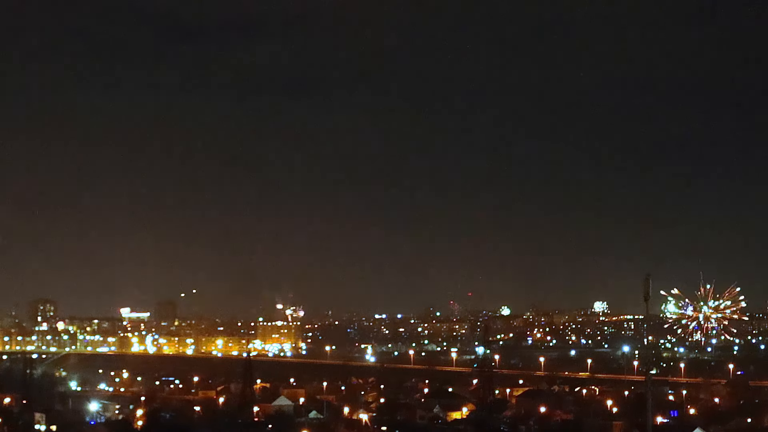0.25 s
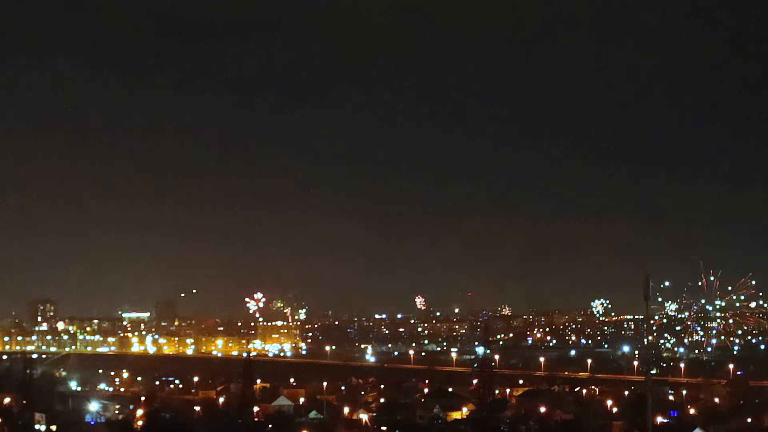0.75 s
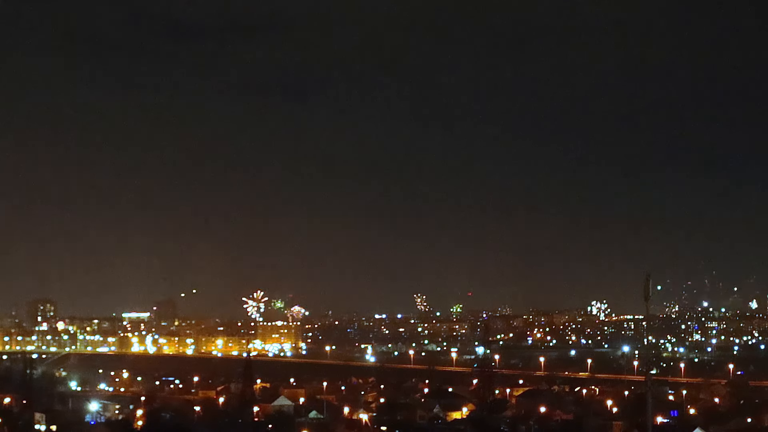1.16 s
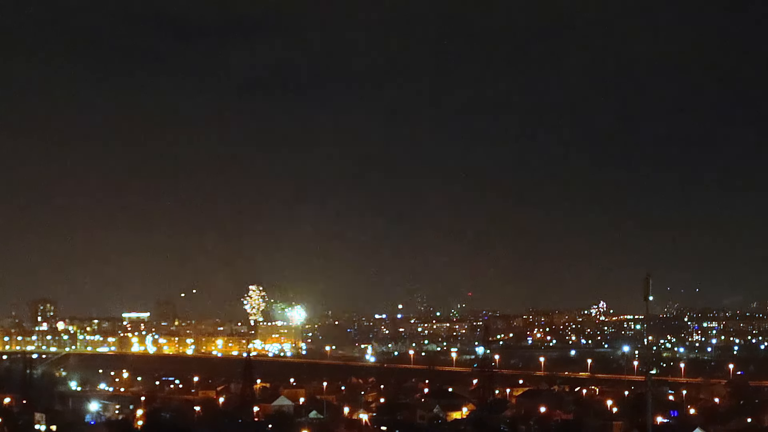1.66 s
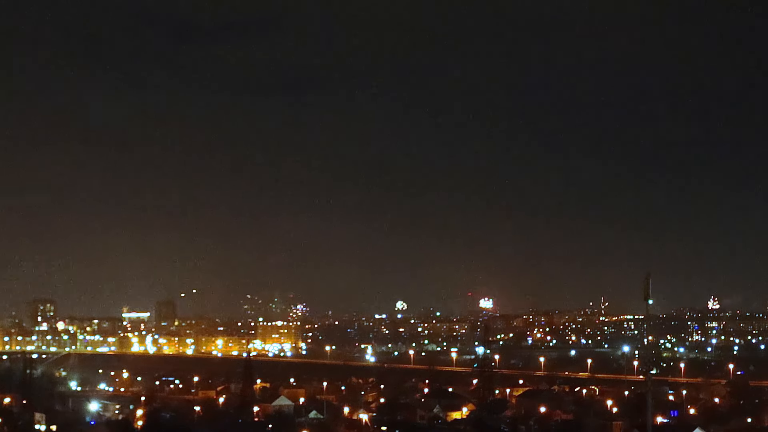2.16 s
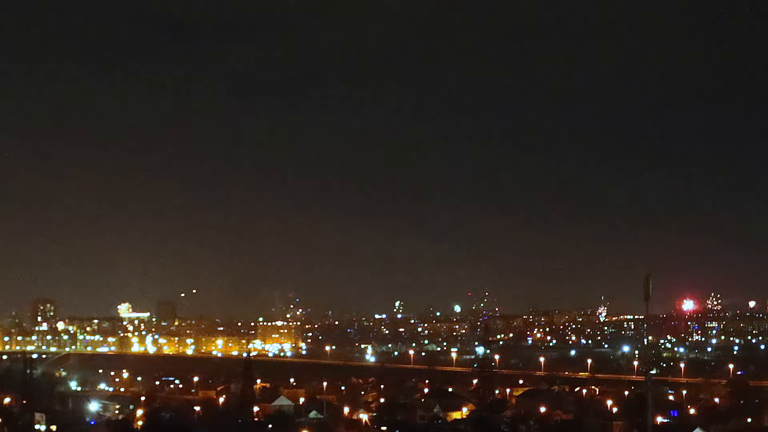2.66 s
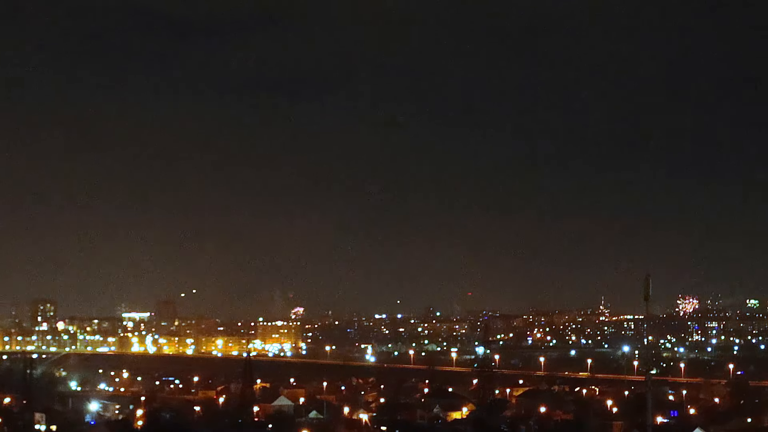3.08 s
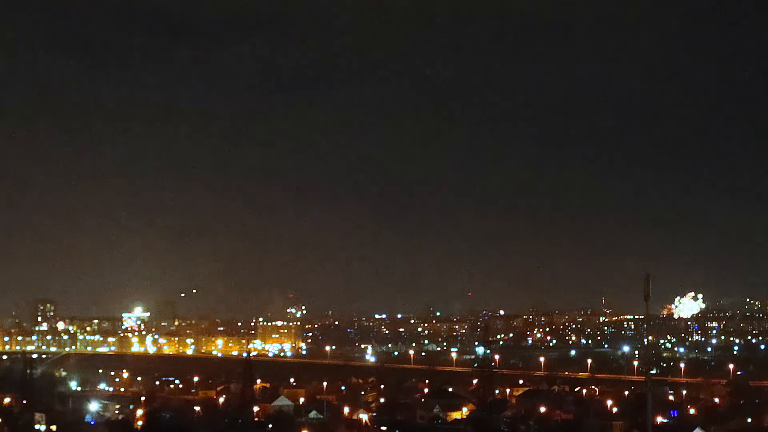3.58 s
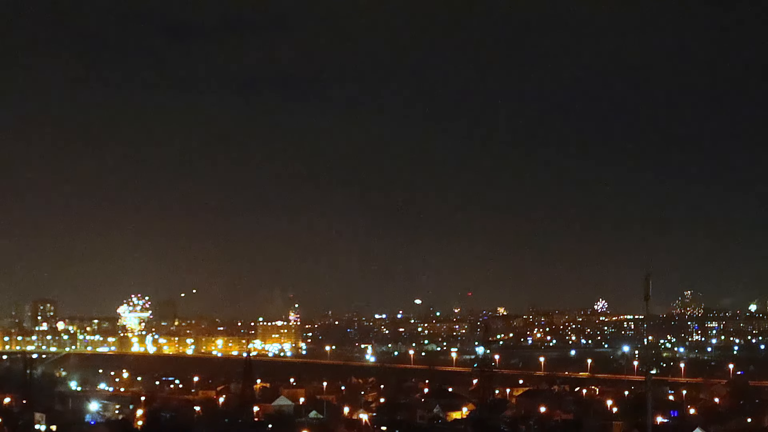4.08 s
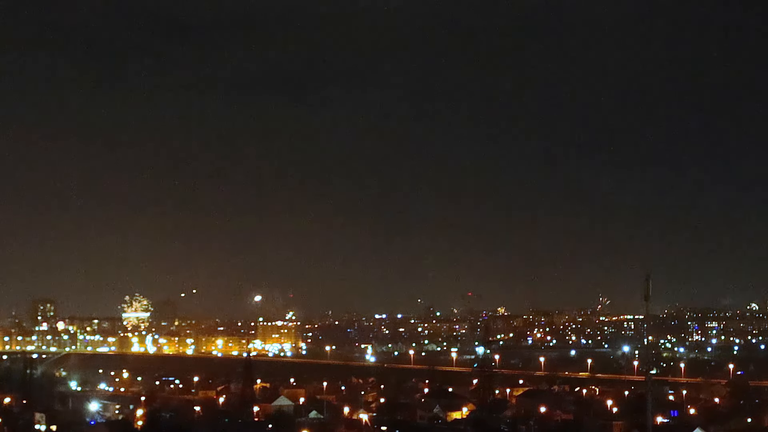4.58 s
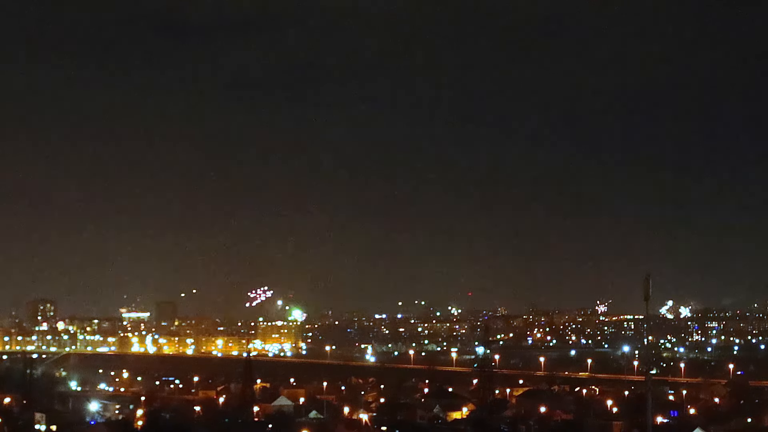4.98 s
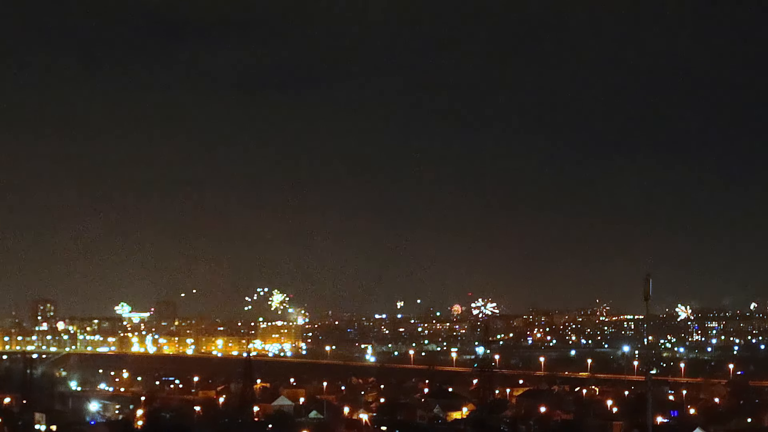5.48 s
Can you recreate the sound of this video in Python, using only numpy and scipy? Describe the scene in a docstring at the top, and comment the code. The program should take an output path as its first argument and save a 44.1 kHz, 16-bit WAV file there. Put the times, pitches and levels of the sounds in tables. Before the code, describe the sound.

Distant fireworks boom across a city at night, dull overlapping thuds and echoes over a low rumble, with a few sharper cracks.

```python
"""Fireworks boom all over a city at night, heard from a high place far away.
Each shell sends a dull thud of air pressure, then a crowd of echoes off the buildings.
The two loudest bangs also snap, a few nearer firecrackers pop, and farther bursts blur into a rumble.
At the start a gust with one sharp tick buffets the right microphone, then the bass thins and
creeps back. Faint rustles and snaps sound close by."""
import sys
import numpy as np
from scipy import signal
from scipy.fft import rfft, irfft, next_fast_len
from scipy.io import wavfile
from scipy.ndimage import uniform_filter1d, minimum_filter1d

SR = 44100
rng = np.random.default_rng(int(sys.argv[2]) if len(sys.argv) > 2 else 0)


def dump(signal):
    """Clip the signal to [-1, 1] and save it as 16-bit WAV at the path in sys.argv[1]."""
    limited = np.clip(np.atleast_2d(signal).T, -1, 1)
    pcm = np.round(limited * 32767).astype(np.int16)
    wavfile.write(sys.argv[1], SR, pcm)


N = 252693
TIME = np.arange(N) / SR

# The clearest shells. Each row: start in seconds, relative thud peak in dB, relative echo level in dB,
# early echo t60 (seconds to fade by 60 dB), treble lift in dB, boom pitch in Hz.
SHELLS = [(0.362, -25, -31.0, 0.39, -0.5, 410), (0.386, -18, -25.5, 0.16, 2, 339),
          (0.49, -21, -29, 0.74, -3.5, 305), (0.546, -13, -22, 0.32, 1, 357),
          (0.662, -15.5, -23, 0.59, -1.5, 428), (0.696, -25.5, -26.5, 0.28, -0.5, 345),
          (0.79, -24.5, -38, 0.2, -13.5, 346), (1.045, -26.5, -28, 0.25, -4.5, 318),
          (1.08, -18, -30, 0.45, 0.5, 285), (1.243, -12, -29.5, 0.81, -6, 290),
          (1.287, -19.5, -27, 0.48, -3.5, 338), (1.494, -9, -25.0, 1.4, -8.5, 327),
          (1.537, -22, -25.5, 0.26, -8, 357), (1.571, -15.5, -22, 0.23, -6.5, 310),
          (1.631, -16.5, -25.5, 0.27, -0.5, 430), (2.016, -20.5, -24, 0.53, -3.5, 315),
          (2.06, -27, -33.5, 0.32, -3, 342), (2.2, -22, -27.5, 2.5, -14.5, 322),
          (2.265, -13, -21.5, 0.18, -2.5, 369), (2.458, -26, -26.5, 1.23, -1, 312),
          (2.4863, -3, -27.5, 0.15, 5.5, 319), (2.518, -20.5, -33, 0.16, -4.5, 334),
          (2.55, -19, -25, 0.24, -0.5, 340), (2.612, -21.0, -29.0, 0.22, -9.5, 344),
          (2.672, -29.5, -26.5, 0.49, -6, 405), (2.782, -12, -24, 0.62, -2, 390),
          (2.953, -18.5, -24.5, 0.69, -8.5, 328), (3.096, -17.5, -32.5, 1, 1, 413),
          (3.15, -10, -21.5, 0.35, 5.5, 252), (3.179, -23, -20.5, 0.21, -6.5, 340),
          (3.228, -25.5, -31.5, 0.28, -7, 329), (3.284, -20.5, -22, 0.33, -5, 382),
          (3.361, -19.5, -24.5, 0.3, -3.5, 310), (3.386, -23.5, -24.5, 0.22, -3, 317),
          (3.407, -16.5, -28, 0.81, -9.0, 305), (3.551, -16, -24.0, 0.41, -7.5, 286),
          (3.59, -23, -31.5, 0.43, 0, 313), (3.676, -19, -31.5, 0.8, 0.5, 292),
          (3.837, -19.5, -26, 1.7, -2, 262), (3.89, -15.5, -23.5, 0.28, -11.5, 318),
          (3.925, -15, -23.5, 0.56, -3, 320), (3.98, -18.5, -24.5, 0.27, -4, 335),
          (4.043, -20, -18.5, 0.4, -5, 295), (4.073, -22.5, -24, 0.32, -9, 347),
          (4.165, -18, -35, 0.17, -12.5, 335), (4.299, -26.5, -33, 0.29, -10.5, 314),
          (4.401, -14.5, -19, 0.24, -11, 470), (4.792, -10, -22.0, 0.61, -5, 330),
          (4.824, -16.5, -28.5, 0.54, -6, 344), (4.865, 1, -20, 0.099, 8.5, 373),
          (4.895, -19, -24, 0.35, -5, 326), (5.043, -16, -23.5, 0.24, -8, 460),
          (5.079, -16.5, -30, 2.8, -8, 460), (5.101, -14, -34.5, 0.18, 7.5, 380),
          (5.135, -18.5, -30, 0.6, 7.5, 383), (5.186, -14, -20.5, 0.2, -2, 374),
          (5.221, -15.5, -20, 0.2, -9, 436), (5.32, -19.5, -20, 0.11, -10.5, 400),
          (5.392, -29.5, -34, 0.33, -14, 342), (5.445, -24.5, -35, 0.24, -17.5, 350),
          (5.528, -19.5, -18.5, 0.24, -5, 381), (5.559, -19, -21, 0.19, -4, 371),
          (5.672, -21.5, -28, 0.31, 0, 390), (5.718, -18, -18.5, 0.27, -5.5, 354)]
# Sharp cracks: nearer firecrackers, the snap of the two loudest bangs, and one tick in the gust.
# Each row: start in seconds, relative level in dB, early t60 in seconds.
CRACKS = [(.113, -42.5, 0.046), (0.547, -40.5, 0.3), (2.237, -27, 0.25), (2.252, -32, 0.14),
          (2.487, -41.5, 0.04), (3.094, -45.5, 0.14), (4.865, -40.5, 0.11)]
# How the far rumble rises and falls. Each row: time in seconds, level in dB.
RUMBLE_LEVELS = [(.2, -36), (.33, -39), (.8, -36), (1.4, -37.5), (1.95, -40.5), (2.15, -37.5), (3, -37),
                 (3.5, -37), (3.8, -41), (4.3, -37.5), (4.7, -37), (5.7, -36)]
# Puffs of wind. Each row: start in seconds, level in dB, hold time in seconds.
WIND_PUFFS = [(0, -24.5, 0.03), (0.038, -14, 0.033), (0.097, -10.5, 0.0068), (0.133, -25, 0.02)]
# Rustles and snaps. Each row: start in seconds, level in dB, pitch in Hz, width in octaves,
# rise time in seconds, t60 in seconds.
RUSTLES = [(.85, -71, 3630, 0.35, 0.011, 0.23), (1.87, -64.5, 2690, 0.24, .009, .2),
           (1.974, -67.5, 3440, .25, .004, 0.21), (2.059, -68, 3420, 0.43, 0.0042, 0.18),
           (3.879, -77, 5700, 0.14, 0.026, 0.55), (4.229, -70.5, 5730, .19, .029, .4),
           (4.344, -58.5, 2680, 0.28, 0.005, 0.19), (4.356, -61.5, 5570, .36, .001, 0.31),
           (4.36, -47, 3340, .18, 0.0015, 0.15), (4.373, -48, 2440, 0.39, 0.0049, 0.28),
           (4.68, -74, 5460, .13, 0.029, 0.29), (5.13, -62.5, 8450, 0.89, .001, 0.32),
           (5.175, -67.5, 8500, 0.75, .008, 0.42), (5.301, -61, 5000, 0.71, .002, 0.31)]
# The tone of each sound, from bass to treble. Each row: frequency in Hz, relative level in dB.
THUD_TONE = [(30, -39), (90, -15.5), (180, -5), (260, 0.5), (350, 7), (480, 0), (650, -20), (1200, -21),
             (2000, -40), (3200, -49), (6000, -59.5), (13000, -84)]
SLAP_TONE = [(100, -30), (300, -1), (550, 8.5), (900, 3.5), (1300, -7), (2000, -19), (3200, -50.5),
             (6000, -69.5)]
ECHO_TONE = [(30, -32), (50, -38), (70, -17), (105, -18), (145, -4.5), (240, -2.5), (350, -3), (500, 2),
             (780, -14.5), (1100, -11.5), (1600, -21.5), (2300, -31), (3200, -61.5), (4500, -64),
             (8000, -95)]
CRACK_TONE = [(200, -28), (700, -13.5), (1200, 9), (1700, 3.5), (2400, -3.5), (3200, -15.5), (4200, -27.5),
              (6000, -49), (9000, -63.5)]
RUMBLE_TONE = [(30, -56.5), (50, -43), (75, -20.5), (140, -8), (230, -7), (350, -5.5), (500, -3),
               (780, -11.5), (1130, -14.5), (1700, -27.5), (2500, -41), (3500, -50.5), (6000, -74.5)]
WIND_TONE = [(25, -25), (70, -3), (150, 6), (280, 4.5), (450, -4), (900, -12), (1600, -32.5), (3000, -68),
             (6000, -90)]
HISS_TONE = [(500, -0.5), (3500, 1), (6000, -1.5), (9000, -8), (12300, -8), (13500, -26)]
# Notes that ring between nearby walls. Each row: pitch in Hz, width in Hz, strength in dB.
WALL_NOTES = [(143.6, 18, -4), (197.7, 19, -1.5), (248.8, 16, 3.5), (326, 55.4, -2), (988, 22, -10)]
# How alike left and right sound. Each row: frequency in Hz, likeness from 0 to 1.
STEREO_LIKENESS = [(60, 0.89), (180, 0.98), (310, 0.97), (540, 0.8), (940, 0.61), (1620, 0.071),
                   (2800, 0.019)]


def shells(thud_db=-5, echo_db=-3, slap_db=-16.5, slap_t60=.053, boom_db=-26.5, boom_t60=.32):
    """Each shell sends a pressure thud, a slap off the nearest roofs, a round boom and city echoes."""
    thuds, echoes = np.zeros((1, N)), np.zeros((2, N))
    t = TIME[:SR]
    for start, peak_db, level_db, t60, treble_db, boom_hz in SHELLS:
        pitch = boom_hz / 350  # bigger charges boom lower
        mid_db = 4.5 + .33 * treble_db
        thud = response(shifted(THUD_TONE, pitch), air(mid_db + 1, treble_db))
        add(thuds, start, undb(peak_db + thud_db) * thud[None] / np.abs(thud).max())
        # The loudest shells burst high above the roofs and slap no harder; small, high-pitched ones do.
        slap_gain = undb(min(peak_db, -6.5) + slap_db + mid_db + 7.5 * np.log2(pitch))
        slap = clicks(len(t), per_s=2300) * fade(t, slap_t60)
        add(echoes, start, slap_gain * through(slap, response(SLAP_TONE)))
        boom = clicks(len(t), per_s=1100) * fade(t, boom_t60)
        boom = through(boom, response(band(boom_hz, octaves=.24)))
        add(echoes, start, undb(peak_db + boom_db) * boom)
        train = hollow(clicks(len(t), per_s=1100))
        train *= roll(t, t60, tail_db=-22, tail_t60=2.3, rise_s=.0002)
        echo_filter = response(shifted(ECHO_TONE, np.sqrt(pitch)), air(mid_db, treble_db))
        add(echoes, start, undb(level_db + echo_db) * through(train, echo_filter))
    return ground_bounce(thuds) + spread(echoes)


def air(mid_db, treble_db):
    """A lift or cut for the middle and treble: air takes more of both from far bursts."""
    return [(450, .011), (950, mid_db), (2400, treble_db)]


def ground_bounce(thud, lag_s=.00524, bounce_db=-13):
    """The thud arrives twice: straight, then bounced off the ground."""
    return thud + undb(bounce_db) * np.interp(TIME - lag_s, TIME, thud[0], left=0)


def hollow(train, depth=.5, count=4):
    """Walls by the launch site repeat the sound within 20 milliseconds, making it hollow."""
    taps = np.zeros(SR // 50)
    taps[rng.integers(len(taps) // 10, len(taps), count)] = depth * rng.choice([-1, 1], count)
    taps[0] = 1
    return through(train, taps / np.sqrt(np.sum(taps ** 2)))


def roll(t, t60, tail_db, tail_t60, rise_s):
    """Echo loudness over time: a quick fade off near blocks, a long roll from the rest of the city."""
    tail = undb(tail_db) * fade(t, tail_t60)
    return np.hypot(fade(t, t60), tail) * (1 - np.exp(-t / rise_s))


def cracks():
    """Sharp cracks: nearer firecrackers, the snap of the two loudest bangs, and one tick in the gust."""
    out, t = np.zeros((2, N)), TIME[:2 * SR]
    for start, db, t60 in CRACKS:
        shape = roll(t, t60, tail_db=-13, tail_t60=1.82, rise_s=.00013)
        add(out, start, undb(db) * clicks(len(t), per_s=1500) * shape)
    return panned(spread(through(out, response(CRACK_TONE))), right_db=4)


def far_rumble(count=110, scatter_db=3, t60=1.0, steady_share=.5):
    """The echoes of many farther bursts overlap into one swelling rumble."""
    power, t = np.zeros((1, N)), TIME[:SR // 2]
    for when, size in zip(rng.random(count), rng.standard_normal(count)):
        burst = undb(scatter_db * np.clip(size, -2, 2)) * fade(t, t60)
        add(power, when * N / SR, burst[None] ** 2)
    swell = np.sqrt(steady_share + (1 - steady_share) * power / power.mean())
    rumble = spread(through(clicks(N, per_s=1500) * swell, response(RUMBLE_TONE)))
    return rumble * undb(np.interp(TIME, *np.transpose(RUMBLE_LEVELS)))


def walls(x):
    """Walls near the listener let a few notes ring on."""
    return x + sum(undb(db) * signal.lfilter(*signal.iirpeak(hz, hz / width, fs=SR), x)
                   for hz, width, db in WALL_NOTES)


def gust(left_db=-22, rise_s=.0077, t60=.079):
    """Swirls of wind thump on the right microphone and barely reach the left one."""
    strength = sum(undb(db) * pulse(TIME - start, rise_s, hold, t60) for start, db, hold in WIND_PUFFS)
    swirls = clicks(N, per_s=1400) * strength
    return through(swirls, response(WIND_TONE)) * undb([[left_db], [0]])


def rustles(clump_db=2, clump_samples=130):
    """Short, faint brushes near the microphone, made of tiny clicks in loose clumps."""
    out, t = np.zeros((2, N)), TIME[:SR // 2]
    for start, db, hz, octaves, rise_s, t60 in RUSTLES:
        wobble = unit(uniform_filter1d(rng.standard_normal(len(t)), clump_samples))
        clumps = unit(undb(clump_db * wobble))
        grains = clicks(len(t), per_s=2600) * pulse(t, rise_s, 0, t60) * clumps
        add(out, start, undb(db) * through(grains, response(band(hz, octaves))))
    return panned(spread(out), right_db=3)


def hiss(level_db=-72):
    """The microphones add a faint, steady hiss."""
    return undb(level_db) * through(rng.standard_normal((2, N)), response(HISS_TONE))


def clicks(size, per_s):
    """Two rows of random clicks; each click stands for one echo, grain or swirl."""
    hits = rng.random((2, size)) < per_s / SR
    return unit(hits * rng.choice([-1, 1], (2, size)) * (.5 + rng.random((2, size))))


def fade(t, t60):
    """Die away by 60 dB every t60 seconds."""
    return undb(-60 * t / t60)


def pulse(t, rise_s, hold_s, t60):
    """Rise, hold, then die away."""
    return np.clip(t / rise_s, 0, 1) * fade(np.maximum(t - rise_s - hold_s, 0), t60)


def undb(db):
    """Turn decibels into a multiplier."""
    return 10 ** (np.asarray(db) / 20)


def unit(x):
    """Scale to an average power of 1."""
    return x / np.sqrt(np.mean(x ** 2))


def band(hz, octaves):
    """A tone with one rounded hump, 4 dB down at this many octaves to either side."""
    return [(hz * 2 ** (k * octaves), -4 * k * k) for k in np.arange(-5, 6)]


def shifted(tone, ratio):
    """Move a tone up or down in pitch."""
    return [(hz * ratio, db) for hz, db in tone]


def on_bins(points, size):
    """Read a curve of (Hz, value) points at each frequency of an FFT."""
    hz, value = np.transpose(points)
    return np.interp(np.log(np.arange(size // 2 + 1) * SR / size + 1), np.log(hz), value)


def response(tone, lift=((1, 0), (2, 0)), size=4096):
    """Build a filter with energy 1 from a tone and an extra lift in dB."""
    cepstrum = irfft(np.log(undb(on_bins(tone, size) + on_bins(lift, size))))
    # Folding onto the first half makes the filter start sharply and ring afterwards.
    cepstrum[1:size // 2] *= 2
    cepstrum[size // 2 + 1:] = 0
    taps = irfft(np.exp(rfft(cepstrum)))[:size // 2]
    return taps / np.sqrt(np.sum(taps ** 2))


def through(x, taps):
    """Pass every channel through a filter."""
    return signal.fftconvolve(x, taps[None], axes=1)[:, :x.shape[1]]


def add(out, start_s, sound):
    """Mix a sound in at its start time."""
    i = min(max(int(start_s * SR), 0), N - 1)
    out[:, i:i + sound.shape[1]] += sound[:, :N - i]


def spread(pair):
    """Turn two unrelated signals into left and right: alike in the bass, apart in the treble."""
    size = next_fast_len(N, True)
    alike = np.clip(on_bins(STEREO_LIKENESS, size), 0, .995)
    side = irfft(rfft(pair[1], size) * np.sqrt((1 - alike) / (1 + alike)), size)[:N]
    return np.array([pair[0] + side, pair[0] - side])


def panned(x, right_db):
    """Move a stereo sound to the right."""
    return x * undb([[-right_db / 2], [right_db / 2]])


def scene(right_lag_samples=4):
    """Mix everything; the left microphone hears the city a little earlier and softer."""
    left, right = walls(shells() + cracks() + far_rumble()) + rustles()
    right = np.interp(TIME - right_lag_samples / SR, TIME, right)
    city = panned(np.array([left, right]), right_db=2.5)
    return city + gust() + hiss()


def thin_bass(x, bass_hz=190, lift_db=1.5, start_s=.17, fall_s=.02, dip_db=-18.5, recover_db_per_s=11.5):
    """The bass, otherwise slightly lifted, drops after the gust and creeps back."""
    bass = signal.sosfiltfilt(signal.butter(2, bass_hz, fs=SR, output="sos"), x)
    since = TIME - start_s
    change_db = np.clip(since / fall_s, 0, 1) * np.minimum(dip_db + recover_db_per_s * since, 0)
    return x - bass * (1 - undb(lift_db + change_db))


def limit(x, ceiling_db=.7, samples=110):
    """A fast limiter turns the level down around any peak above the ceiling."""
    gain = np.minimum(undb(ceiling_db) / (np.abs(x).max(axis=0) + 1e-9), 1)
    return x * uniform_filter1d(minimum_filter1d(gain, samples), samples)


def record(dry, top_hz=13500):
    """Thin the bass for a moment, limit and just clip the loudest thuds, and cut the highest treble."""
    clipped = np.clip(limit(thin_bass(dry)), -.98, .98)
    return signal.sosfilt(signal.ellip(8, .2, 70, top_hz, fs=SR, output="sos"), clipped)


dry = scene()
out = record(dry)
dump(out)
```